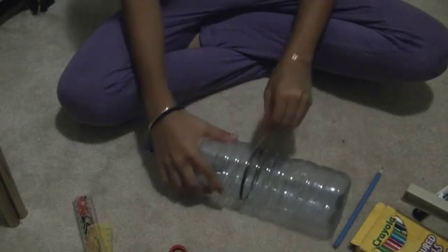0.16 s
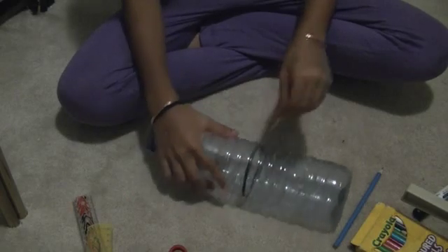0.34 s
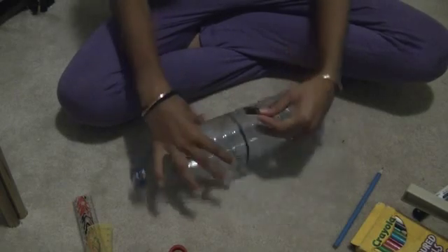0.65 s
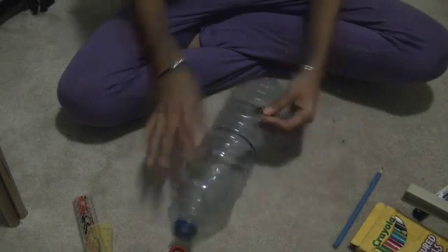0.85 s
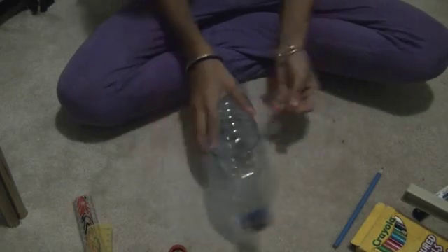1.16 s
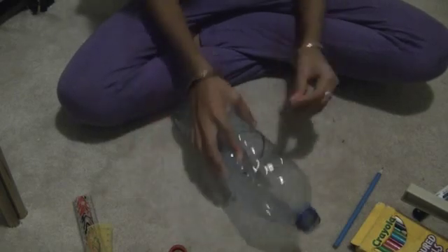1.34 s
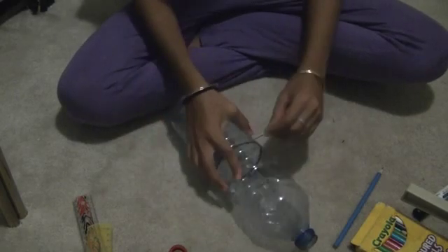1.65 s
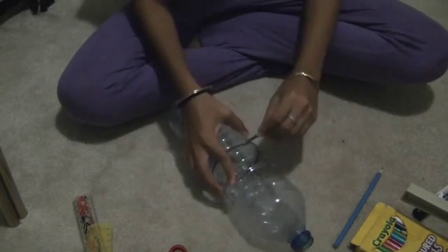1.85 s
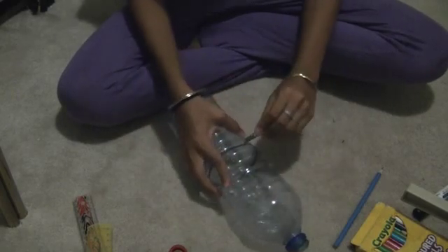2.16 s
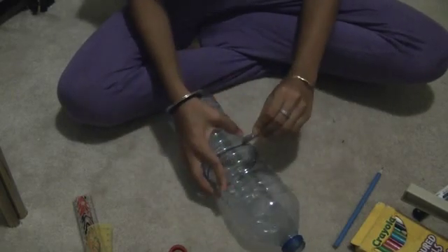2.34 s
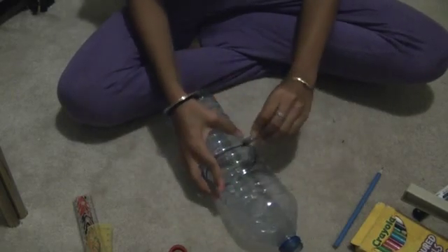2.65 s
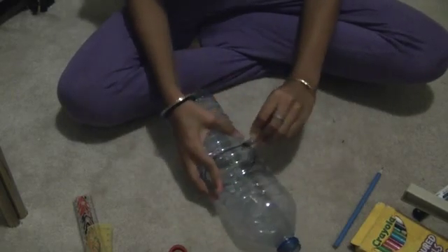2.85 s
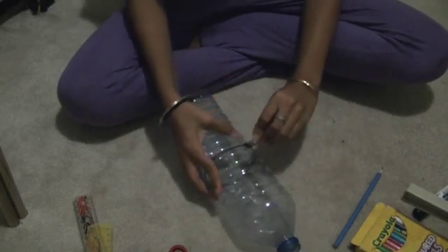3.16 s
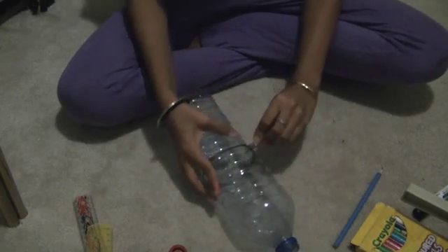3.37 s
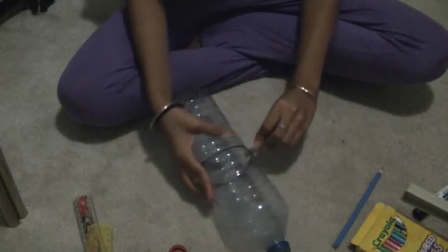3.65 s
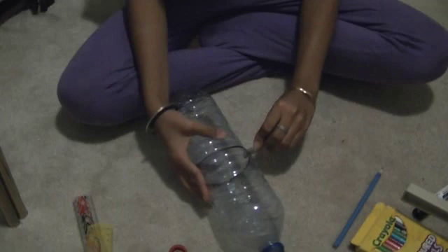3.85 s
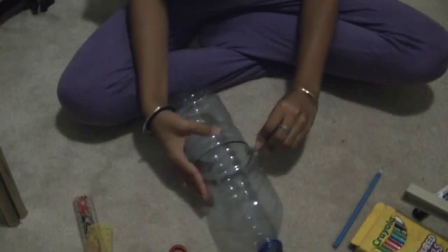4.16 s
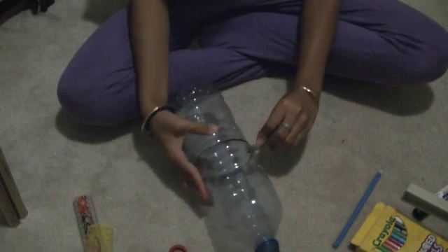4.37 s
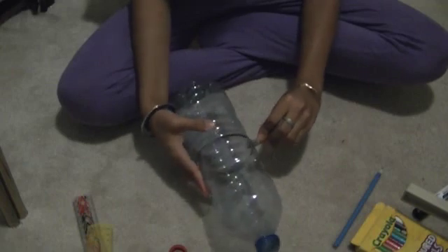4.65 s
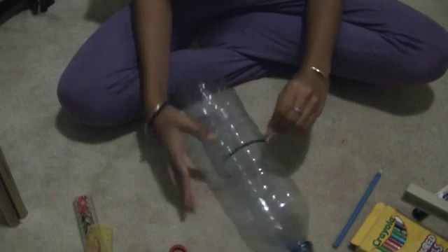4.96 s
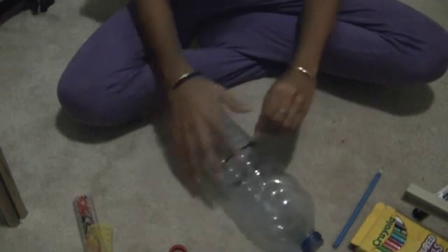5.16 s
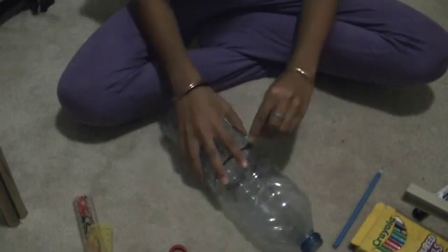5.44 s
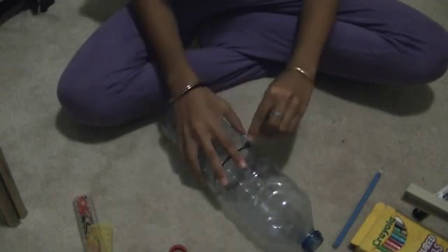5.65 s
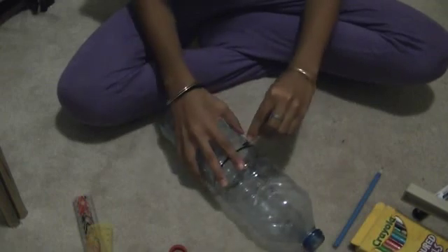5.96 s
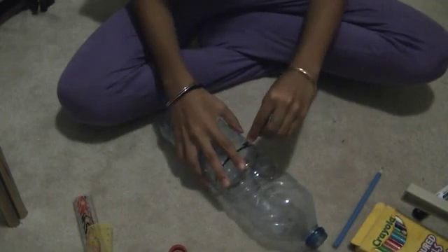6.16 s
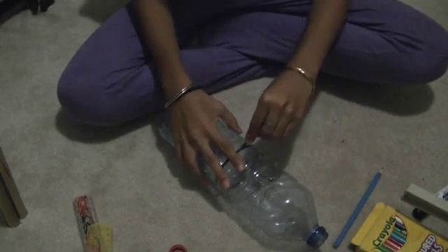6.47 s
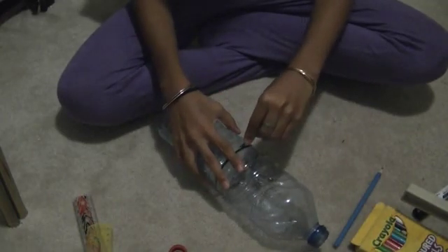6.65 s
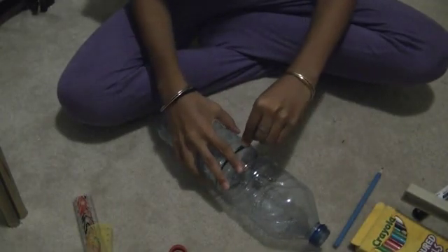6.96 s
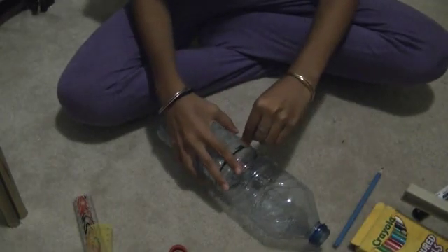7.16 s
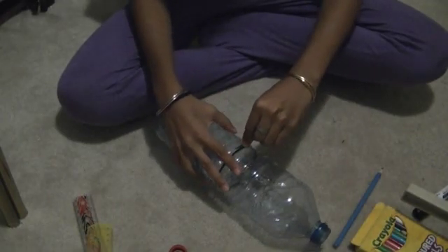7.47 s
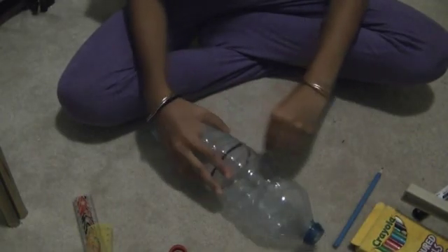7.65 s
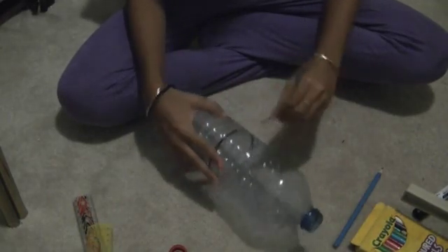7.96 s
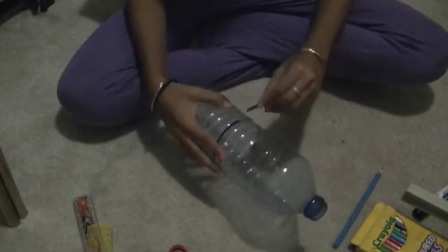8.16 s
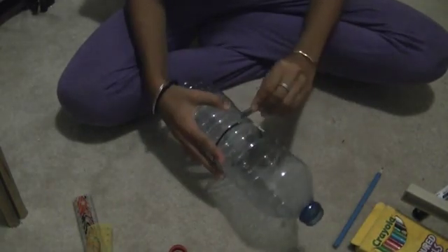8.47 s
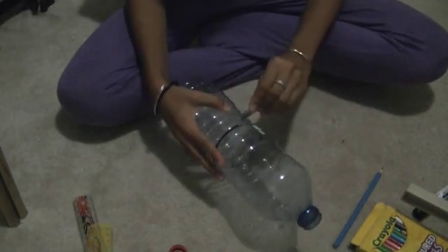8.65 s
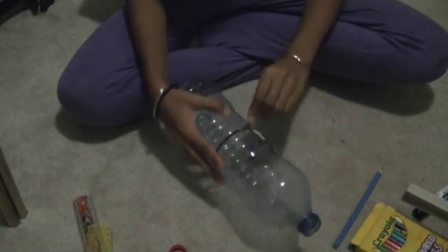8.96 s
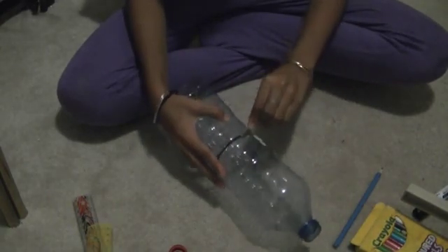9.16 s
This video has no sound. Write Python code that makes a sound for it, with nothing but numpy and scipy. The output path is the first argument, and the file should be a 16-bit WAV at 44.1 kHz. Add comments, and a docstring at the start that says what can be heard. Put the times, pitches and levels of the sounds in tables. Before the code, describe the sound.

Irregular hollow plastic clicks, pops and short scraping rubs from a handled bottle, close up indoors, over faint hiss and a pulsing electronic whine.

```python
"""Sharp plastic snaps, dry scrapes, squeaks and thin metallic rings over hiss and a pulsing whine.
A thin bottle is turned on a carpet and cut with a small blade in a small room: its wall snaps through,
blade and fingers stick and slip along it, fingertips tap it, a slap and bangles ring, weight shifts.
Forces drive the resonances of wall and enclosed air, and a diffuse tail answers from the room.
The camera adds shaped noise for its hiss, and sine tones, gated or steady, for its electronics."""
import sys
import numpy as np
from scipy import signal
from scipy.fft import rfft, irfft, next_fast_len
from scipy.io import wavfile
from scipy.ndimage import uniform_filter1d

SR = 44100
rng = np.random.default_rng(int(sys.argv[2]) if len(sys.argv) > 2 else 0)


def master_out(mix):
    """Clip the mix to full scale and print it as 16-bit PCM to the path in sys.argv[1]."""
    frames = np.transpose(np.atleast_2d(mix))
    ceiling = np.clip(frames, -1, 1)
    pcm = np.round(ceiling * 32767).astype(np.int16)
    wavfile.write(sys.argv[1], SR, pcm)


N = 410571


def amp(db):
    """Level as a pressure ratio: 20 dB is a factor of ten."""
    return 10 ** (np.asarray(db) / 20)


def rms(x):
    """Effective value: the root of the mean square."""
    return np.sqrt(np.mean(x ** 2) + 1e-20)


def along(points, hz):
    """Spectral curve: interpolates (hz, value) points on a logarithmic frequency axis."""
    f, v = np.transpose(points)
    return np.interp(np.log(hz + 1), np.log(f + 1), v)


def filtered(x, response):
    """Linear filtering: multiplies the spectrum of x by a response of frequency."""
    n = x.shape[-1]
    m = 2 * next_fast_len(n // 2 + SR // 20)
    spectrum = rfft(x, m)
    return irfft(spectrum * response(np.fft.rfftfreq(m, 1 / SR)), m)[..., :n]


def causal(gain):
    """Minimum phase: folds the cepstrum so that the response follows its cause."""
    cepstrum = irfft(np.log(np.maximum(gain, 1e-6)))
    half = len(cepstrum) // 2
    cepstrum[1:half] *= 2
    cepstrum[half + 1:] = 0
    return np.exp(rfft(cepstrum))


def resonances(modes, f):
    """Modal superposition: adds the powers of damped modes (hz, width_hz, level_db) and returns a gain."""
    power = 0
    for centre, width, db in modes:
        peak = amp(db) * f * width / (centre * centre - f * f + 1j * f * width)
        power = power + np.abs(peak) ** 2
    return np.sqrt(power)


def pair(size, side_db):
    """Partial coherence: noise shared by both channels plus a part of opposite sign."""
    mid, side = rng.standard_normal((2, size))
    return np.array([mid + amp(side_db) * side, mid - amp(side_db) * side])


def widened(x, width):
    """Mid-side stereo: scales the difference of the channels by (hz, side_db) points."""
    left, right = x
    mid = (left + right) / 2
    side = filtered((left - right) / 2, lambda f: amp(along(width, f)))
    return np.array([mid + side, mid - side])


def add(track, x, s):
    """Superposition: mixes x into the track from time s."""
    i = round(s * SR)
    x = x[:, max(-i, 0):N - i]
    track[:, max(i, 0):max(i, 0) + x.shape[1]] += x


def swell(t, start, crest, end, depth_db):
    """Amplitude envelope: grows to full strength at its crest and relaxes."""
    phase = np.interp(t, [start, crest, end], [-1, 0, 1])
    return amp(-depth_db * np.abs(phase) ** 1.3) * (1 - phase ** 4)


def echo(x, side_db=-4):
    """Diffuse reverberation: convolves x with noise that decays at its own rate in each frequency bin."""
    # reverberation time of the room: hz, t60_s
    decay_times = [(150, 0.29), (400, 0.25), (1000, 0.22), (3000, 0.23), (8000, 0.27), (15000, 0.17)]
    # how strongly the room answers: hz, level_db
    room_colour = [(150, -1), (330, -2.5), (460, -2), (700, 1.5), (1200, 0.5), (3000, -0.5), (8000, -4),
                   (15000, -1)]
    hz, t, z = signal.stft(pair(SR // 4, side_db), SR, nperseg=256)
    decay = amp(-60 * t / along(decay_times, hz)[:, None])
    onset = 1 - np.exp(-t / 0.0006)
    tail = signal.istft(z * decay * onset, SR, nperseg=256)[1]
    tail = tail / np.linalg.norm(tail[0])
    tail = filtered(tail, lambda f: causal(amp(along(room_colour, f))))
    return signal.fftconvolve(x, tail, axes=1)[:, :x.shape[1]]


def room(x, wet_db):
    """Direct and reverberant fields: adds the room's answer to the sound itself."""
    return x + amp(wet_db) * echo(x)


def bottle(force, all_round, hollow_hz, wet_db, window, db, thump_db, edge_db, crisp_db, panel,
           hollow_width_hz=42, hollow_db=12, panel_wet_db=-4):
    """Forced vibration: a force ahead and one all round excite the modes of the wall and enclosed air.

    Over the window (s), four bands set the strength of hollow, wall, edge and crease."""
    # modes of the bottle's wall: hz, width_hz, level_db
    wall_modes = [(310, 22, 10.5), (604, 29, 1.5), (708, 21, 7.5), (930, 63, -5.5), (1024, 10, 3.5),
                  (1115, 40, 4.5), (1351, 40, 6.5), (1694, 29, 4.5), (1954, 240, 4.5), (2580, 47, -0.5),
                  (3430, 140, -1), (3554, 71, 2), (4180, 100, 4), (4720, 180, -0.5)]
    # colour of a slip or a snap: hz, level_db (spectral density, per Hz)
    plastic_colour = [(30, -4), (90, -6.5), (150, 0.5), (260, -2.5), (370, 1), (480, 1.5), (620, 4.5),
                      (1100, 3.5), (2000, -2), (3200, -7.5), (4400, -10.5), (5700, -6), (8000, -2.5),
                      (10500, -6.5), (13000, -14), (16000, -36)]
    modes = [(hollow_hz, hollow_width_hz, hollow_db), *wall_modes]

    def shell_response(f):
        # little sound leaves below the hollow note
        radiated = 0.18 + 1 / np.sqrt(1 + (0.84 * hollow_hz / (f + 1)) ** 8)
        return causal(amp(along(plastic_colour, f)) * radiated * np.hypot(1, resonances(modes, f)))

    shell, spread = filtered(np.array([force, all_round]), shell_response)
    x = shell + amp(wet_db) * echo(spread)
    # the panel adds its own note, which the room answers at its own level
    panel_note = filtered(shell, lambda f: causal(np.hypot(1, resonances(panel, f))) - 1)
    x = x + room(panel_note, panel_wet_db)

    heard = slice(*(int(edge * SR) for edge in window))
    bands = [(150, 500), (600, 2200), (2400, 5000), (5000, 15000)]  # Hz
    parts = filtered(x.mean(0), lambda f: np.array([(f > lo) & (f < hi) for lo, hi in bands]))
    present_db = 20 * np.log10([rms(part[heard]) for part in parts])
    wanted_db = db + np.array([thump_db, 0, edge_db, crisp_db])
    hollow, wall, edge, crease = wanted_db - present_db
    colour = [(90, min(hollow, wall)), (200, hollow), (440, hollow), (620, wall), (1500, wall),
              (2700, edge), (4700, edge), (5500, crease)]
    return filtered(x, lambda f: causal(amp(along(colour, f))))


def strokes(slip_rate_hz=700, scatter_db=1.0, slip_s=0.0023, depth_db=12, panel_db=3, panel_q=9):
    """Stick-slip friction: blade and fingers make dense tiny rasps and a few harder catches on a panel."""
    # scrapes: start_s, crest_s, end_s, level_db (wall band), thump_db and crisp_db (relative to level_db),
    # panel_hz (note of the rubbed panel)
    scrapes = [(-0.1, -0.005, 0.2, -38.5, -5, -8.5, 617), (0.307, 0.354, 0.49, -48.5, -5, -3.5, 990),
               (0.519, 0.571, 0.69, -59, -4, -4.5, 2110), (0.684, 0.732, 0.91, -59, -11, -2.5, 626),
               (0.918, 0.948, 1.02, -57, 1.5, 0, 1830), (1.004, 1.063, 1.08, -48, -11.0, -9.5, 1840),
               (1.062, 1.08, 1.17, -49, -5, 0.5, 800), (1.272, 1.316, 1.39, -48.5, -4.5, -13, 1750),
               (1.409, 1.492, 1.6, -58.5, -7, -4, 1940), (2.696, 2.781, 2.92, -53.5, -13, -8, 1030),
               (2.932, 2.973, 3.12, -47, -3, -11.5, 1200), (3.155, 3.218, 3.3, -45, -9.5, -8.5, 1380),
               (3.251, 3.296, 3.335, -49, -28, -9, 1800), (3.438, 3.524, 3.62, -49, -3.5, -6.5, 1730),
               (3.649, 3.814, 3.97, -50, -6.5, -7.5, 785), (3.952, 3.999, 4.07, -41.5, -3, -5.5, 1940),
               (4.381, 4.486, 4.61, -53, -10.5, -16, 1690), (4.63, 4.703, 4.81, -53.5, 3.5, -2, 1440),
               (4.848, 4.893, 4.92, -54.5, 3, -10, 690), (5.195, 5.219, 5.27, -45, 1, -14, 785),
               (5.2, 5.276, 5.34, -51, 1.5, -5.5, 1470), (6.103, 6.139, 6.23, -42.5, -4.5, -13, 1070),
               (6.33, 6.408, 6.5, -57, -8, -13.0, 640), (6.669, 6.713, 6.8, -35, -6, -13, 1070),
               (6.899, 6.96, 7.02, -62.5, 5.5, -18.5, 646), (7.172, 7.214, 7.27, -53.0, 3.5, -4, 1340),
               (7.442, 7.511, 7.63, -35, -3, -11, 1890), (8.769, 8.784, 8.84, -53, -7, -23, 1900)]
    # the hollow note follows the grip: time_s, hollow_hz
    grip = [(0, 221), (.9, 174), (1.33, 223), (2.98, 269), (3.25, 257), (4, 339), (5.2, 290), (6.1, 324),
            (8.7, 330)]
    catch_rate_hz, catch_size, catch_s = 70, 5, 0.0008  # size is relative to one slip
    out = np.zeros((2, N))
    for start, crest, end, db, thump_db, crisp_db, panel_hz in scrapes:
        t = start + np.arange(int((end - start + .2) * SR)) / SR
        slip_sizes = amp(scatter_db * np.clip(rng.standard_normal(len(t)), -2, 2))
        slips = (rng.random(len(t)) < slip_rate_hz / SR) * slip_sizes
        rasp = signal.lfilter([1], [1, -np.exp(-1 / (slip_s * SR))], slips)
        catches = (rng.random(len(t)) < catch_rate_hz / SR) * catch_size * rng.uniform(.5, 1.4, len(t))
        jerks = signal.lfilter([1], [1, -np.exp(-1 / (catch_s * SR))], catches)
        grit = rasp + .5 + jerks  # the constant is steady rubbing
        force = grit * pair(len(t), side_db=-11.5) * swell(t, start, crest, end, depth_db)
        middle = max(crest - start, .02)
        edge_db = -3 + 0.62 * crisp_db  # a crisper scrape has more edge too
        sound = bottle(force, force, np.interp(crest, *np.transpose(grip)), wet_db=-4.5,
                       window=(middle - .02, middle + .02), db=db, thump_db=thump_db, edge_db=edge_db,
                       crisp_db=crisp_db, panel=[(panel_hz, panel_hz / panel_q, panel_db)], hollow_db=14)
        add(out, sound, start)
    return out


def hiss(before_widening_db=-61):
    """Stationary noise: microphone hiss, falling in the treble, largely of opposite sign in the channels."""
    # relative colour of the hiss: hz, level_db (spectral density, per Hz)
    hiss_colour = [(15, -26), (25, -18), (70, -13), (110, -10.5), (326, -5), (700, -8.5), (1000, -10),
                   (1500, -12), (3000, -16), (10700, -24.5), (14800, -34), (16000, -38)]
    # very wide, most of all in the low middle: hz, side_db
    hiss_spread = [(30, -10), (100, 16), (350, 15.5), (700, 15.5), (1400, 12.5), (2800, 10), (6000, 7.5),
                   (12000, 8)]
    noise = filtered(pair(N, side_db=-8.0), lambda f: amp(along(hiss_colour, f)))
    return amp(before_widening_db) * widened(noise / rms(noise), hiss_spread)


def steady_tones():
    """Phase diffusion: a random walk of phase makes the camera's steady tones slightly unsteady."""
    # steady camera tones: hz, level_db (rms)
    lines = [(328, -73.5), (942, -71.5), (5523, -86), (8242, -85)]
    t = np.arange(N) / SR
    out = np.zeros(N)
    for hz, db in lines:
        drift = 0.0068 * np.cumsum(rng.standard_normal(N))  # radians
        out += np.sqrt(2) * amp(db) * np.sin(2 * np.pi * hz * t + drift)
    return out


def whine(hz=2720, db=-64.0, surge_db=7):
    """Phase and amplitude modulation: the camera's whine pauses ten times a second and surges twice.

    It also rests once; db is its rms level while it runs between surges."""
    t = np.arange(N) / SR
    running = ((t - .052) % .1 < .077) & ((t < 4.1) | (t > 5.08))
    surging = (t - .106) % .5 < .022
    gate = uniform_filter1d(running * amp(surge_db * surging), size=130)
    buzz = 0.65 * np.sin(2 * np.pi * 80 * t)
    return np.sqrt(2) * amp(db) * gate * np.sin(2 * np.pi * hz * t + buzz)


def warble(hz=985, blip_db=-59.5, held_db=-55, tick_hz=3822, tick_db=-69.5):
    """Amplitude gating: a lower whine blips unevenly and holds once; a faint higher one ticks at 30 Hz.

    Levels are the rms of each sine with its gate fully open."""
    t = np.arange(N) / SR
    gaps = rng.uniform(.015, .04, 600)  # s
    blip = np.interp(t, np.cumsum(gaps), np.arange(len(gaps)))
    start_cycles = rng.random(len(gaps))[blip.astype(int)]  # a fresh phase for each blip
    blips = np.sin(np.pi * blip) ** 8 * np.sin(2 * np.pi * (hz * t + start_cycles))
    hold = uniform_filter1d(1. * ((t > 2.568) & (t < 2.638)), size=300)
    held = hold * np.sin(2 * np.pi * hz * t)
    tick_gate = np.maximum(np.cos(2 * np.pi * 30 * t), 0) ** 5
    ticks = tick_gate * np.sin(2 * np.pi * tick_hz * t)
    return np.sqrt(2) * (amp(blip_db) * blips + amp(held_db) * held + amp(tick_db) * ticks)


def snaps(push_s=0.00085, push=0.47, crack_s=0.0011, crack=1.36, flutter_hz=1900, flutter_t60_s=0.16,
          bending_hz=450, panel_db=9, panel_q=6, overtone_db=-2, trim_db=-1.5):
    """Snap-through buckling: a panel cracks, flips in milliseconds, shoves the air inside and flutters."""
    # buckling of the wall: start_s, level_db (wall band, before trim_db),
    # thump_db, edge_db and crisp_db (relative to level_db), hollow_hz, panel_hz,
    # flip_s (time to flip), flutter_db (start of the flutter, before its filter)
    buckles = [(0.031, -38.5, -3, -11, -19, 378, 646, 0.0028, -18),
               (0.111, -39.5, -1.5, -10, -13, 378, 650, 0.0033, -18),
               (0.129, -23.5, -8, -3, -5.5, 410, 2060, 0.0033, -14),
               (0.371, -47.5, 0, -14, -5, 420, 785, 0.003, -16),
               (0.393, -40, -7, -9.5, -10.5, 227, 630, 0.0026, -8),
               (0.4245, -45.5, -1, -2.5, -4, 348, 664, 0.0042, -20),
               (0.4545, -49.5, 5.5, -2, -9, 204, 1000, 0.0025, -16),
               (0.963, -47, -6, -7, -13, 397, 1810, 0.0065, -22),
               (1.023, -54, -2, 3, 4, 470, 1810, 0.0063, -18),
               (1.1873, -16.5, -13, -11.5, -13.5, 283, 946, 0.0031, -17),
               (1.8815, -48.5, -7, -8, -9.5, 333, 885, 0.0093, -10),
               (2.003, -53.5, -5, -5.5, -7, 330, 700, 0.0028, -4),
               (2.0215, -53.5, -10, -2, -8, 326, 1020, 0.0013, -22),
               (2.1315, -51.5, -3, -7, -7.5, 316, 1760, 0.0026, -11),
               (2.2615, -55.5, -0.5, -6, -2, 427, 1370, 0.0055, -15),
               (2.3225, -38, -15, -1.5, -9, 289, 980, 0.013, -11),
               (2.3269, -36, -8, -25, -7, 253, 1330, 0.0046, -5.5),
               (3.2002, -34.5, -7, -12, -19, 252, 1010, 0.0043, -10),
               (3.225, -45, -11, -11, -11, 260, 900, 0.002, -19),
               (3.2535, -53, -1, 6, -2, 263, 2160, 0.004, -21),
               (3.57, -55, 0, -4, -2, 370, 1060, 0.0016, -22),
               (4.1092, -44, -14, -8, -15, 330, 1040, 0.0058, -5),
               (4.6952, -32, -16, -11, -13, 386, 2030, 0.0074, -15),
               (4.755, -44.5, 0, -12, -10, 333, 1950, 0.0029, -15),
               (4.854, -52, 7, -9, 3, 400, 1070, 0.0039, -25),
               (5.092, -50.5, -24, -14, -14, 320, 1040, 0.0044, -12),
               (5.1995, -33, -4, -13.5, -13, 388, 1090, 0.011, -21),
               (5.3513, -37, -18, 2.5, 6, 388, 680, 0.0044, -5),
               (5.405, -30, -7, -16.5, -19, 326, 1260, 0.0048, -10.5),
               (5.7608, -27, -8, -1.5, 4, 315, 1210, 0.0041, -9),
               (6.1122, -29.5, 1.5, -6.0, -10.5, 332, 1150, 0.0062, -0.5),
               (6.167, -41.5, 0, -7, -2, 330, 1190, 0.0073, -21),
               (6.6416, -39.5, -6, -12.5, -9, 370, 620, 0.0018, -3),
               (6.6768, -32.5, -13, 0, 7.5, 425, 1150, 0.0057, -10),
               (7.4384, -32, 3, -10.5, -11.5, 356, 1350, 0.0055, 1),
               (7.494, -37.5, 7.5, -7, -6, 332, 1905, 0.0058, -9),
               (7.5248, -31.5, 7.5, 0, 2, 335, 1340, 0.0038, -13),
               (7.5522, -21.5, 3, -10.5, -12, 350, 1600, 0.0037, -12),
               (7.5575, -27.5, 1, -3.5, -10, 335, 724, 0.0052, -14),
               (7.572, -33, -18, -6, -8, 325, 1220, 0.0056, -12),
               (8.2525, -57, 3.5, -6, -4, 330, 710, 0.0059, -9),
               (8.6254, -21, -12, -1, -5.5, 368, 1270, 0.0055, -19),
               (8.735, -46, 1.5, -3.5, -8, 327, 1070, 0.009, 0),
               (8.9118, -49, -7, 4, 2.5, 327, 990, 0.0026, -4.5)]
    out, t = np.zeros((2, N)), np.arange(SR // 5) / SR
    shove = push * np.exp(-(t / push_s - 2) ** 2)
    kick = signal.unit_impulse(len(t), np.argmax(shove))
    crease = crack * np.exp(-(t / crack_s - 1) ** 2)

    def bending(f):
        """Band limitation: slow bending remains, yet hardly pumps the air."""
        return 1j * f / (bending_hz + 1j * f) / (1 + 1j * f / flutter_hz) ** 2

    for s, db, thump_db, edge_db, crisp_db, hollow_hz, panel_hz, flip_s, flutter_db in [*buckles, *taps()]:
        flutter = amp(flutter_db - 60 * t / flutter_t60_s)
        wobble = filtered(flutter * pair(len(t), side_db=-8.0), bending)
        flip = np.exp(-(t / flip_s) ** 2) * (1 - np.exp(-t / (0.19 * flip_s)))
        tick = crease * np.diff(pair(len(t) + 1, side_db=-21.0))  # differencing favours the treble
        force = shove + tick + flip * pair(len(t), side_db=-12.0) + wobble
        # summed over all directions, the crack evens out into one clean kick
        flip_kick = np.linalg.norm(flip) * kick
        crease_kick = np.linalg.norm(crease) * np.diff(kick, prepend=0)
        all_round = shove + flip_kick + crease_kick + wobble
        panel = [(panel_hz, panel_hz / panel_q, panel_db),
                 (1.96 * panel_hz, panel_hz / 2, overtone_db)]  # note and overtone
        sound = bottle(force, all_round, hollow_hz, wet_db=-5.0, window=(0, .012), db=db + trim_db,
                       thump_db=thump_db, edge_db=edge_db, crisp_db=crisp_db, panel=panel,
                       hollow_width_hz=62)
        add(out, sound, s)
    return out


def taps(edge_db=-12, crisp_db=-17, panel_hz=1100, flip_s=0.0086, flutter_db=-8):
    """Slow forcing: fingertips press a panel in as dull snaps that move the air inside."""
    # soft landings: start_s, level_db (wall band, before the trim in snaps),
    # thump_db (relative to level_db), hollow_hz
    landings = [(0.341, -49, 4, 418), (0.412, -48, 5.5, 343), (0.492, -46.5, 2.5, 200),
                (0.654, -53, 5.5, 175), (0.712, -50, 3.5, 300), (0.757, -51, 3.5, 208),
                (0.931, -53, 8, 164), (0.952, -48.5, 1, 334), (1.072, -41.5, 1, 204), (1.091, -52, -6, 203),
                (1.305, -52, -10, 240), (1.535, -62, 5, 313), (4.718, -48, 9.5, 313),
                (4.888, -50.5, 7.5, 397), (4.902, -52, -3, 392), (5.009, -52.5, -2, 406),
                (5.04, -44, -0.5, 318), (5.057, -48, -1, 323), (5.336, -41, 9, 390),
                (5.484, -49.5, 4.5, 320), (6.056, -44.5, -2.5, 297), (6.199, -49, 1, 306),
                (8.544, -47.5, -2, 340), (8.565, -47.5, -1, 386), (8.782, -47.5, -15, 328),
                (9.088, -49, 2, 318)]
    return [(s, db, thump_db, edge_db, crisp_db, hollow_hz, panel_hz, flip_s, flutter_db)
            for s, db, thump_db, hollow_hz in landings]


def bangles():
    """Friction-driven modes: steel bangles rub as the hands move, and ring in thin high lines."""
    # slides on the wrists: start_s, crest_s, end_s, level_db (at the crest, before the room)
    slides = [(1.06, 1.1, 1.17, -44), (1.22, 1.32, 1.39, -52), (5.095, 5.105, 5.13, -62),
              (5.22, 5.28, 5.34, -55)]
    # ring of a steel bangle: hz, width_hz, level_db (relative)
    ring_modes = [(2780, 40, -1), (3370, 50, 0), (3570, 40, -3), (3800, 50, -4), (4500, 60, 0),
                  (5350, 60, -4), (5900, 60, -5), (6650, 70, -3), (7250, 70, -2), (7900, 70, -2),
                  (8550, 70, -1), (9050, 70, 0), (10100, 90, -3), (11000, 120, -2), (11800, 90, -2),
                  (14800, 120, -4), (15550, 120, -5)]
    t = np.arange(N) / SR
    rub = pair(N, side_db=-11)
    ring = lambda f: causal(resonances(ring_modes, f))
    effort = np.zeros(N)
    for start, crest, end, db in slides:
        effort += amp(db) * swell(t, start, crest, end, depth_db=10.0)
    ringing = filtered(rub * effort, ring) / rms(filtered(rub, ring))
    return room(ringing, wet_db=-6)


def squeaks_and_rings():
    """Narrow-band noise: a band and its octave give squeaks, a slapped bottle's ring and a bangle's ring."""
    # squeaks, a slapped bottle's ring (781 Hz) and a bangle's ring (3345 Hz): start_s, crest_s, end_s,
    # pitch_hz, width_hz, level_db (at the crest), octave_db (relative to the main band)
    sung_bands = [(1.068, 1.09, 1.2, 690, 190, -36.5, -20), (1.068, 1.095, 1.15, 1030, 50, -43, -16),
                  (1.12, 1.14, 1.16, 1745, 60, -44.5, -14), (1.28, 1.315, 1.36, 1740, 70, -51, -5),
                  (1.3, 1.345, 1.39, 1950, 200, -50, -14), (5.198, 5.212, 5.29, 781, 36, -39, -17),
                  (5.2, 5.27, 5.35, 3345, 70, -51.5, -20), (8.29, 8.34, 8.4, 13000, 2600, -65, -40)]
    out = np.zeros((2, N))
    for start, crest, end, hz, width, db, octave_db in sung_bands:
        t = start + np.arange(int((end - start) * SR)) / SR

        def bands(f):
            """Resonant selection: a narrow band and a wider one at the octave."""
            octave = resonances([(2 * hz, 2 * width, 0)], f) ** 2
            return resonances([(hz, width, 0)], f) ** 2 + amp(octave_db) * octave

        tone = filtered(pair(len(t), side_db=-12), bands)
        add(out, amp(db) * tone / rms(tone) * swell(t, start, crest, end, depth_db=19), start)
    return out


def carpet(db=-63):
    """Low-frequency resonance: a soft bump at two low bands as weight shifts on the floor."""
    modes = [(70, 30, -1.6), (164, 79, -1.4)]  # hz, width_hz, level_db (squared in the filter)
    bump = filtered(pair(N, side_db=-10), lambda f: resonances(modes, f) ** 2)
    push = swell(np.arange(N) / SR, 2.62, 2.66, 2.85, depth_db=13)
    return amp(db) * bump / rms(bump) * push


def scene():
    """Superposition: the handling, most alike in both channels near the hollow note, plus camera noise."""
    # how much the two microphones differ: hz, side_db
    handling_spread = [(60, 9), (130, 2), (300, -5.5), (700, -1.5), (1400, 1), (2800, 4), (5500, 7.5),
                       (9000, 4.5), (14000, 5.5)]
    handling = strokes() + snaps() + bangles() + squeaks_and_rings() + carpet()
    return widened(handling, handling_spread) + hiss() + steady_tones() + whine() + warble()


def record(dry, top_hz=16300):
    """Band limitation: the camera keeps nothing above its upper limit."""
    return filtered(dry, lambda hz: hz < top_hz)


dry = scene()
out = record(dry)
master_out(out)
```